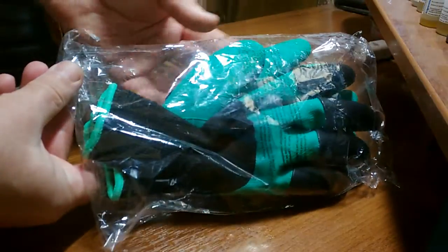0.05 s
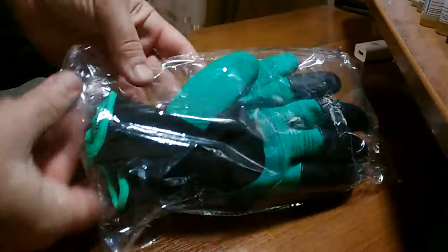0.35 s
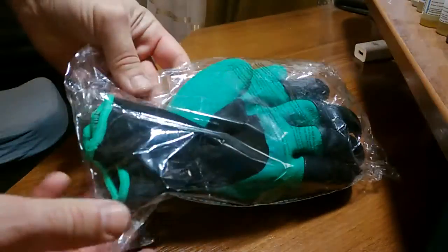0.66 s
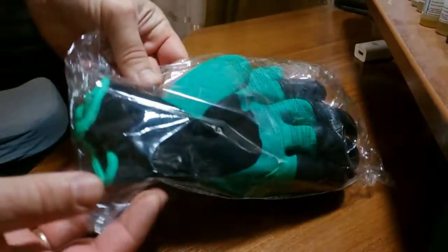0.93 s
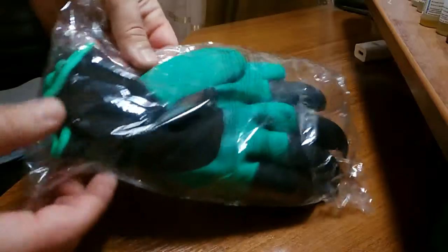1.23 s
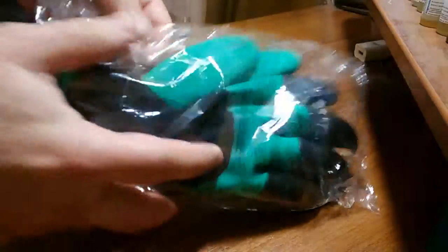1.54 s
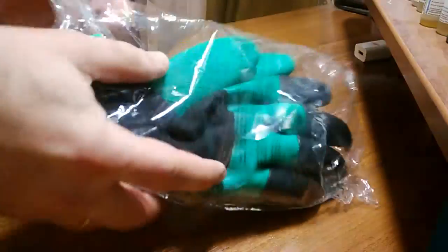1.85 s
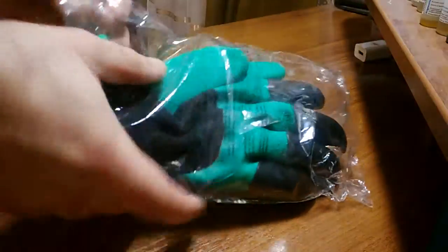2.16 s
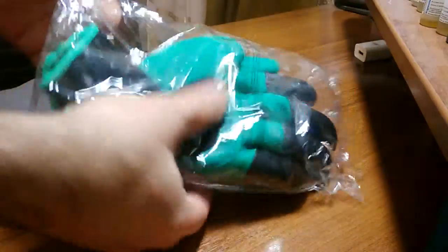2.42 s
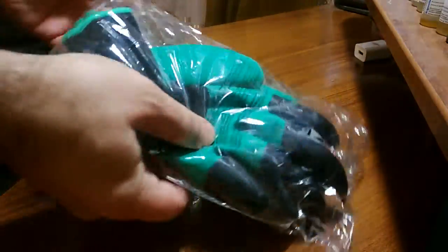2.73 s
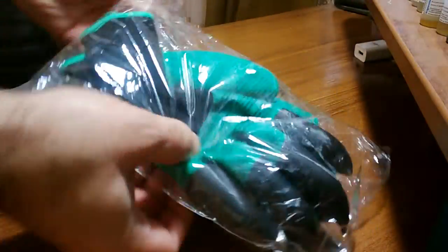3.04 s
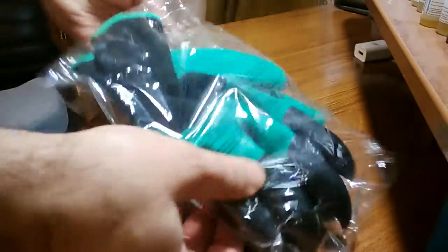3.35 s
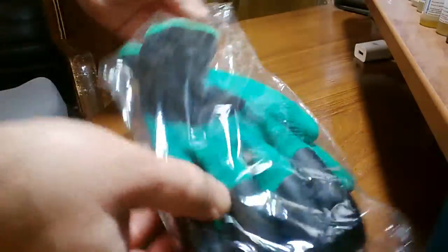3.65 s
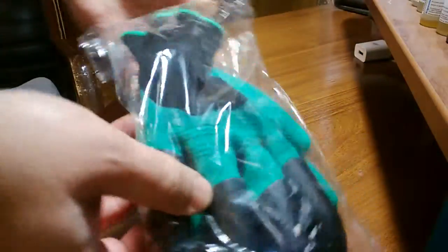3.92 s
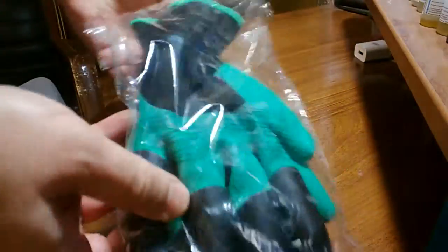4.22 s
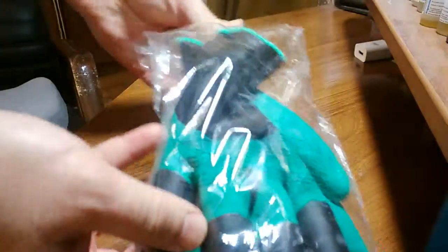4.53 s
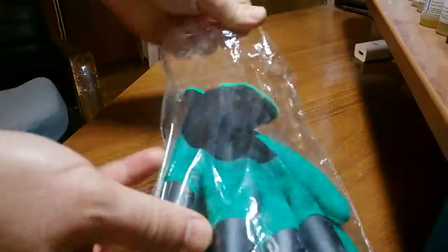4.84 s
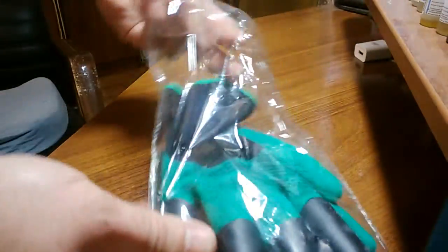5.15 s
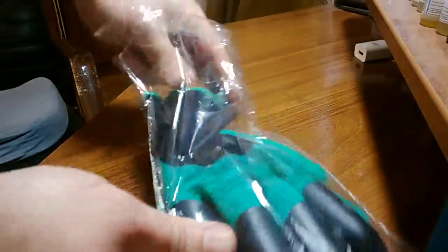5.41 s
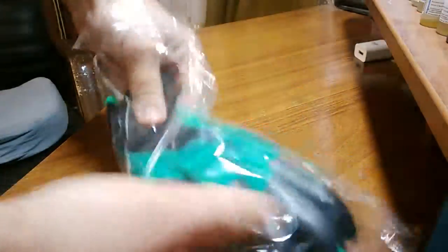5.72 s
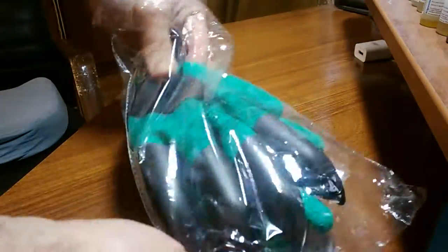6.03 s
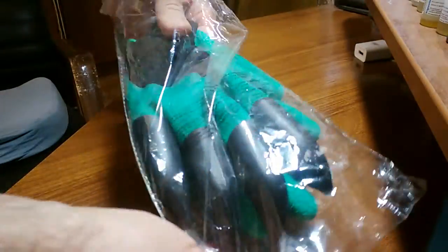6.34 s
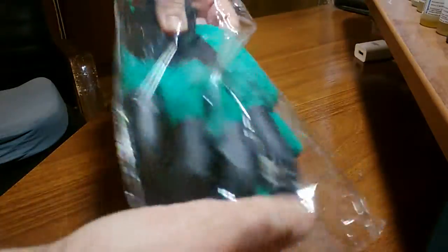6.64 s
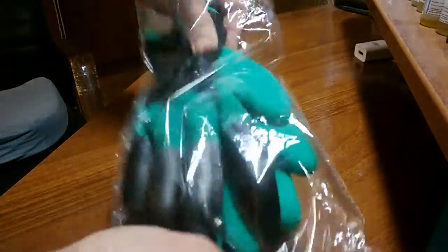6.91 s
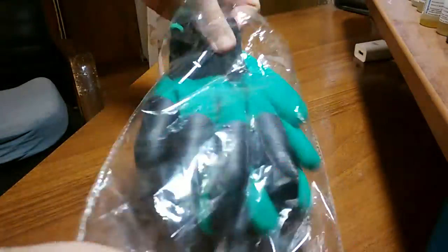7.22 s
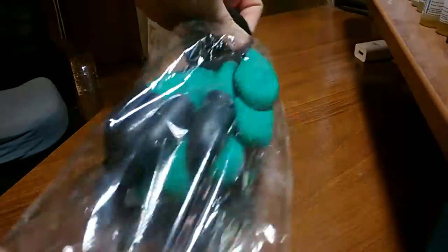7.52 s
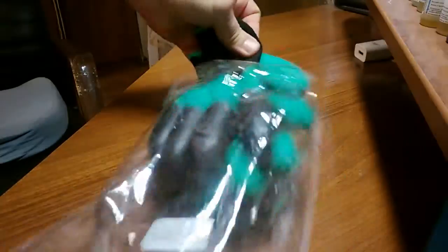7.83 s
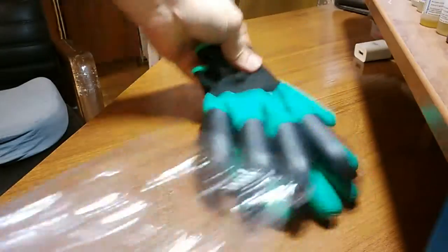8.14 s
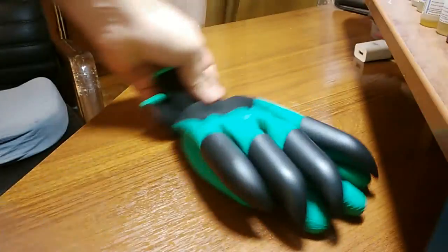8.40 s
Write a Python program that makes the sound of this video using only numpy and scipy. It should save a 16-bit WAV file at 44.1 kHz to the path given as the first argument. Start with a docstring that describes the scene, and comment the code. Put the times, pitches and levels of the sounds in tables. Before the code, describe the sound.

In a small room, hands handle a thin plastic bag with gloves inside. A light rustle grows into bright crinkling, with short grips, brief pauses, sharp snaps and small hollow pops, while the gloves bump softly within. Later their hard claws tap a wooden table, then the gloves rub out through the bag's mouth and the rustle dies away. The microphone is close.

```python
"""In a small room, hands take up a thin plastic bag on a wooden table. First comes a light rustle: creases
buckle in avalanches of clicks, film slides on film, and gloves bump softly inside. Short grips and
pauses follow, with sharp snaps and hollow pops. Near 6.4 s the gloves' hard claws tap the table; from
7.6 s the gloves rub out through the bag's mouth, and with one last tap the rustle dies away.
Throughout, a close microphone with a resonance near 5 kHz makes the crinkle bright."""
import sys
import numpy as np
from scipy import signal
from scipy.fft import rfft, irfft
from scipy.io import wavfile
from scipy.ndimage import uniform_filter1d

SR = 44100
rng = np.random.default_rng(int(sys.argv[2]) if len(sys.argv) > 2 else 0)


def to_wav(s):
    """Save 16-bit WAV."""
    ch = np.atleast_2d(s).T  # columns
    pcm = np.round(np.clip(ch, -1, 1) * 32767)  # PCM
    wavfile.write(sys.argv[1], SR, pcm.astype(np.int16))


N = 373527
TIME = np.arange(N) / SR

# Levels are relative; spectra give level per unit bandwidth.
# light rustle of the held bag: t/s, crease level/dB, folds re creases/dB, glove level/dB
LIGHT_RUSTLE = [(0, -48.5, -14, -71), (0.17, -52.5, -9, -60), (0.22, -42.5, -8.5, -59),
                (0.45, -40, -9.5, -52), (0.85, -38, -6.5, -63), (1.3, -35.5, -8.5, -56),
                (2.3, -36, -6.5, -59), (3.1, -38, -7, -69), (3.8, -37, -8, -58.5), (4.5, -38, -4.5, -51),
                (5.45, -37.5, -9.5, -63), (5.75, -31.5, -10.5, -55), (7.08, -31.5, -10, -51),
                (7.65, -35.5, -16.5, -52.5), (8.22, -38, -14, -50.5), (8.27, -55.5, -18, -69),
                (8.47, -60.5, -4, -74)]
# fingers grip the bag: t/s, duration/s, crease level/dB, folds re creases/dB, glove level/dB
FINGER_GRIPS = [(0.384, 0.41, -36, -6.5, -53), (0.97, 0.046, -35, -10.5, -56),
                (1.176, 0.16, -34.5, -7.5, -55), (1.396, 0.19, -36, -8, -61), (1.602, 0.18, -29, -7.5, -46),
                (1.779, 0.22, -32, -6, -53), (2.069, 0.14, -37.5, -6, -67), (2.316, 0.12, -36.5, -12, -59),
                (2.563, .13, -22, -9.5, -38.5), (2.797, 0.095, -31.5, -10.5, -64.5),
                (3.187, 0.19, -29.5, -10, -49), (3.413, 0.15, -30.5, -7.5, -45),
                (3.56, 0.15, -22.5, -9, -38.5), (3.869, 0.097, -29, -11, -49),
                (3.995, 0.029, -29, -13, -45), (4.271, .175, -32, -10.5, -61),
                (4.52, 0.097, -36, -13.5, -61), (4.661, 0.073, -33, -7, -55), (4.822, .082, -20, -13, -44),
                (4.936, 0.077, -26, -13, -46), (5.022, 0.26, -31, -9, -52.5), (5.569, 0.12, -27, -11, -50),
                (5.833, 0.057, -31, -9.5, -46), (5.992, 0.13, -24.5, -13, -45),
                (6.13, 0.17, -34.5, -9.5, -65), (6.494, 0.11, -29.5, -14, -48.5),
                (6.768, 0.13, -29, -9, -56), (6.88, 0.16, -28, -7.5, -53), (7.157, 0.18, -28.5, -9, -48.5),
                (7.362, 0.13, -33, -6.5, -66), (7.692, .135, -28, -11.5, -62),
                (7.95, 0.19, -30.5, -11, -48)]
# the hands rest and the rustle sinks: t/s, duration/s, drop/dB
HAND_PAUSES = [(0.889, 0.096, 7.5), (1.548, .05, 10), (2.003, 0.041, 1.5), (3.011, 0.096, 4),
               (3.366, 0.029, 4), (4.027, 0.032, 8.5), (4.609, .06, 15), (4.727, 0.042, 5), (5.246, .04, 7),
               (5.939, 0.024, 3), (6.445, 0.05, 17), (7.82, .12, 5)]
# spectrum of tight creases: f/Hz, level/dB
CREASE_SPECTRUM = [(1500, -28.5), (3100, -17), (4000, -5.5), (4600, 0.5), (6000, 1), (7100, -7.5),
                   (8800, -11.5), (10300, -16), (12500, -18.5), (16000, -20.5)]
# spectrum of broad folds: f/Hz, level/dB
FOLD_SPECTRUM = [(90, -23), (260, -7.5), (430, -2), (570, -9.5), (720, -3), (1100, -7), (1400, 0),
                 (1650, 1), (2100, 1.5), (2800, 0.5), (3400, -2), (6000, -20)]
# how strongly the taut, air-filled bag pops: t/s, level re folds/dB
POP_LEVELS = [(0, -5), (1.5, -9), (2.8, -9), (3.8, -0.5), (4.5, -1), (5.3, -5.5), (6, -7), (7.1, -9),
              (7.5, -8), (8.47, -31)]
# spectrum of the stuffed bag: f/Hz, level/dB
BULK_SPECTRUM = [(20, -24), (40, -14), (58, -2.5), (85, -0.5), (115, 1), (150, -7), (200, -3.5),
                 (300, -11.5), (450, -16.5), (700, -11), (1500, -16.5)]
# soft bumps of fingers and gloves: t/s, level/dB, f/Hz
SOFT_BUMPS = [(0.2, -49, 105), (0.988, -55, 104.5), (1.468, -42.5, 92), (2.602, -38, 200),
              (3.255, -35.5, 90), (3.455, -33, 292), (4.012, -41, 113.3), (4.829, -35.5, 95.4),
              (6.015, -48, 110.7), (7.956, -46, 239)]
# spectrum of the room air: f/Hz, level/dB
AIR_SPECTRUM = [(20, -14), (50, 14), (110, 4), (200, -8), (700, -31), (2000, -4), (5300, -36), (16000, -6)]
# large creases snap through: t/s, level over the first 5 ms/dB, folds re creases/dB, decay time/s
CREASE_SNAPS = [(0.023, -46, -24, 0.0017), (0.065, -45.5, -2.5, 0.0034), (0.306, -33, -10, 0.0044),
                (0.554, -28.5, -27, 0.0036), (0.7092, -28.5, -9.5, .005), (0.757, -38, -25, 0.0023),
                (1.058, -35.5, -17, .003), (1.15, -25.5, -10.5, 0.005), (1.345, -27.5, -4, 0.0029),
                (1.6208, -27.5, -4, 0.0057), (1.6871, -31.5, 5.5, 0.01), (1.8014, -24, -12, 0.0089),
                (2.067, -27.5, -14, 0.011), (2.234, -30.5, -12.5, 0.0035), (2.368, -28.5, -8.5, 0.0042),
                (2.4368, -30, -25, .003), (2.466, -34.5, -2, .004), (2.5564, -31.5, -9, 0.012),
                (2.6444, -19, -12, 0.0018), (2.7308, -26.5, -23, .003), (2.802, -29, -7.5, .002),
                (2.9283, -29.5, -6, 0.0025), (3.0358, -47.5, 10.5, .003), (3.141, -33.5, -19, 0.0034),
                (3.1935, -28.5, -11.5, 0.0036), (3.3704, -28, -32, .007), (3.4242, -25.5, -11, 0.029),
                (3.508, -22.5, -15, 0.014), (3.5549, -20.5, -10, 0.0056), (3.667, -20.5, -6, 0.0063),
                (3.9381, -22.5, -12, 0.0076), (4.022, -28, -6, 0.0037), (4.083, -33, -7.5, 0.018),
                (4.1916, -27, -7, 0.0035), (4.321, -26, -15, .002), (4.802, -32.5, -9, 0.039),
                (4.8348, -26, 1, 0.0083), (4.8862, -12, -16, 0.0013), (4.8987, -21, -12, 0.0025),
                (4.963, -26, -23, 0.0036), (5.055, -25.5, -15, 0.023), (5.246, -25, -9.5, 0.0036),
                (5.293, -33, -6.5, 0.015), (5.4158, -31, -18.5, 0.0054), (5.4636, -33, -22, 0.009),
                (5.5006, -35.5, -2.5, .005), (5.8798, -26.5, -12, 0.0032), (5.916, -26, -12, .003),
                (6.08, -22, -25, 0.002), (6.108, -21.5, -19, 0.0022), (6.1962, -24, -10.5, .005),
                (6.2937, -25.5, -12, 0.0044), (6.386, -27.5, -19, .004), (6.442, -23, -9.5, 0.0043),
                (6.729, -27, -8, 0.0022), (6.829, -30, -11, .004), (6.848, -25.5, -13, 0.0071),
                (6.9625, -23.5, -1, 0.0045), (7.155, -24, -21, .004), (7.207, -27.5, -4.5, 0.0037),
                (8.039, -28, -23, .002), (8.17, -29, -19, .005), (8.233, -30.5, -13.5, 0.0034)]
# the gloves' claws tap the table: t/s, f/Hz, level/dB, T60/s
CLAW_TAPS = [(6.414, 375, -36.5, 0.12), (6.443, 860, -29.5, 0.022), (8.303, 654, -51, 0.038)]
# the gloves are tugged out of the bag: t/s, duration/s, level/dB
GLOVE_TUGS = [(7.59, 0.038, -35.5), (7.745, 0.1, -42), (8.04, .12, -42)]
# spectrum of the open bag as a cavity: f/Hz, level/dB
MOUTH_SPECTRUM = [(200, -13.5), (450, -0.5), (780, 3.5), (950, 7), (1150, -16), (1500, -0.5), (3000, -5.5)]
# narrow resonances and two dips, from table top and microphone port: f/Hz, bandwidth/Hz, gain/dB
TABLE_AND_PORT = [(377, 59, -8.5), (720, 18, 2.5), (963, 26, 5.5), (1607, 66, -12), (5250, 350, 3.5),
                  (7870, 650, 0.5)]


def from_db(db):
    """Amplitude ratio: tenfold for every 20 dB."""
    return 10 ** (np.asarray(db) / 20)


def rms_one(x):
    """Normalisation to unit mean power."""
    return x / np.sqrt(np.mean(x ** 2) + 1e-20)


def in_time(rows):
    """Linear interpolation of each column of a curve at every sample."""
    times, *columns = np.transpose(rows)
    return [np.interp(TIME, times, column) for column in columns]


def through(x, impulse_response):
    """Convolution: the output of a linear system."""
    return signal.oaconvolve(x, impulse_response)[:N]


def scatter(spread_db):
    """Random gains, uniformly distributed in level with standard deviation spread_db."""
    return from_db(spread_db * rng.uniform(-np.sqrt(3), np.sqrt(3), N))


def evened(x, span_s):
    """Division by the running rms holds the slow level at 1 and keeps the fast grain."""
    power = x ** 2
    for _ in range(2):
        power = uniform_filter1d(power, max(int(span_s * SR), 1))
    return x / np.sqrt(np.maximum(power, 1e-12))


def response(spectrum, travel_s=0, ring_hz=1000, ring_db=0, ring_width_hz=260, size=2048):
    """Unit-energy filter with optional resonance and dispersion: in bending waves the treble leads."""
    hz = np.maximum(np.arange(size // 2 + 1) * SR / size, 1)
    points_hz, levels_db = np.transpose(spectrum)
    gain = from_db(np.interp(np.log(hz), np.log(points_hz), levels_db))
    detuning = 2 * (hz - ring_hz) / ring_width_hz
    gain = gain * np.sqrt(1 + (from_db(ring_db) ** 2 - 1) / (1 + detuning ** 2))
    cepstrum = irfft(np.log(gain))
    cepstrum[size // 2:] = 0   # minimum phase
    cepstrum[0] = 0
    phase_lag = 4 * np.pi * travel_s * np.sqrt(5000 * hz)   # group delay is travel_s at 5 kHz
    impulse = irfft(np.exp(2 * rfft(cepstrum) - 1j * phase_lag))
    return impulse / np.linalg.norm(impulse)


def stroke(start_s, length_s, catch_s=.03, swell_db=4.5, tightest_share=.55, let_go_db_per_s=402):
    """Amplitude envelope of one finger movement: catch the film, swell, ease, let go."""
    age = TIME - start_s
    share = np.clip(age / length_s, 0, 1)
    slack = np.minimum(np.abs(share - tightest_share) * 2, 1)
    let_go_db = let_go_db_per_s * np.clip(age - length_s, 0, 1)
    return np.clip(age / catch_s, 0, 1) * from_db(-swell_db * slack ** 2 - let_go_db)


def handling():
    """Incoherent sources add in power: rustle plus grips gives crease, fold and glove levels in dB."""
    crease_db, folds_db, gloves_db = in_time(LIGHT_RUSTLE)
    drop_db = sum(db * stroke(start_s, length_s) for start_s, length_s, db in HAND_PAUSES)
    power = from_db([crease_db, crease_db + folds_db, gloves_db] - drop_db) ** 2
    for start_s, length_s, crease_db, folds_db, gloves_db in FINGER_GRIPS:
        grip_power = from_db([crease_db, crease_db + folds_db, gloves_db]) ** 2
        power += np.outer(grip_power, stroke(start_s, length_s) ** 2)
    return 10 * np.log10(power)


def avalanche(buckles, fade_s, clicks_per_s, rise_s=0.00025):
    """Chain reaction: a buckle sets off its neighbours in a shower of clicks that swells and dies."""
    power = buckles ** 2 + 1e-18
    for pole in np.exp(-1 / (rise_s * SR)), np.exp(-2 / (fade_s * SR)):
        power = signal.lfilter([1 - pole], [1, -pole], power)
    chance = rng.random(N) * SR / clicks_per_s
    clicks = np.sign(chance - .5) * (chance < 1)
    return np.sqrt(power * SR / clicks_per_s) * clicks


def facets(buckles, spectrum, low_hz, high_hz, base_fade_s, edge_db=5, edge_hz=9000, count=10):
    """Resonance and dispersion: each facet has its own ring, sharpness and path across the film."""
    facet_of = rng.integers(0, count, N)
    points_hz, levels_db = np.transpose(spectrum)
    sharpness = rng.permutation(np.linspace(-1, 1, count))
    out = 0
    for k, hz in enumerate(np.geomspace(low_hz, high_hz, count)):
        shelf_db = edge_db * sharpness[k] / (1 + (edge_hz / points_hz) ** 4)
        colour = np.column_stack([points_hz, levels_db + shelf_db])
        fade_s = base_fade_s * 2 ** rng.uniform(0.87, 1)
        shower = avalanche(buckles * (facet_of == k), fade_s, clicks_per_s=3600)
        travel_s = 0.00081 * rng.uniform(0.51, 1.475)
        out = out + through(shower, response(colour, travel_s, hz, ring_db=7))
    return out


def pops(flips_per_s, low_hz=1950, high_hz=2330, width_hz=170, count=6):
    """Impulse-excited resonators: taut panels flip over and ring hollowly for a few milliseconds."""
    flips = (rng.random(N) < flips_per_s / SR) * scatter(spread_db=5) * rng.choice([-1, 1], N)
    panel_of = rng.integers(0, count, N)
    out = 0
    for k, hz in enumerate(np.geomspace(low_hz, high_hz, count)):
        panel = signal.iirpeak(hz, hz / width_hz, fs=SR)
        out = out + signal.lfilter(*panel, flips * (panel_of == k) + 1e-18)
    return out


def crinkle(crease_db, fold_db, median_buckles_per_s=235, slide_db=-15, loose_db=-40, firm_db=-29):
    """Buckling and friction: random ticks and pops over sliding hiss, denser under a firm grip."""
    pace = from_db(0.7 * (crease_db - np.median(crease_db)))
    firmness = np.clip((crease_db - loose_db) / (firm_db - loose_db), 0, 1)
    buckles = (rng.random(N) < median_buckles_per_s * pace / SR) * scatter(spread_db=2.5)
    # separate random gains make some buckles crisp, some dull
    creases = facets(buckles * scatter(1), CREASE_SPECTRUM, low_hz=4550, high_hz=6400, base_fade_s=.0045)
    folds = facets(buckles * scatter(1), FOLD_SPECTRUM, low_hz=770, high_hz=2800, base_fade_s=.004)
    taut_db, = in_time(POP_LEVELS)
    out = from_db(fold_db + taut_db) * evened(pops(flips_per_s=100 * pace), span_s=0.18)
    layers = (creases, CREASE_SPECTRUM, crease_db - 1.1), (folds, FOLD_SPECTRUM, fold_db - 1.56)
    for clicks, spectrum, level_db in layers:
        slide = through(rng.standard_normal(N), response(spectrum)) * np.sqrt(pace)
        film = rms_one(clicks) + from_db(slide_db) * slide
        crush, ticks = evened(film, span_s=0.041), evened(film, span_s=0.056)
        out = out + from_db(level_db) * (firmness * crush + (1 - firmness) * ticks)
    return out


def gloves(level_db, flop_gain_db=4.5, bump_gain_db=2.0, lumps_per_s=90):
    """Heavy damping: the padded bag flops in dull lumps, and firmer bumps ring for a cycle or two."""
    lumps = rng.standard_normal(N) * (rng.random(N) < lumps_per_s / SR)
    lumps = lumps + avalanche(lumps, fade_s=0.021, clicks_per_s=1700)
    flops = through(lumps, response(BULK_SPECTRUM, size=8192))
    out = from_db(level_db + flop_gain_db) * evened(flops, span_s=0.026)
    for start_s, bump_db, hz in SOFT_BUMPS:
        start = int(start_s * SR)
        cycles = hz * TIME[:min(SR // 4, N - start)]
        envelope = from_db(bump_db + bump_gain_db) * 2 * cycles * np.exp(1 - 2 * cycles)
        out[start:start + len(cycles)] += envelope * np.sin(2 * np.pi * cycles)
    return out


def room_air():
    """Stationary noise: the low rumble and faint hiss of a still room."""
    return through(rng.standard_normal(N), response(AIR_SPECTRUM, size=8192))


def reverberation(x, t60_s=0.31, wall_cut_hz=9000, build_s=0.011, count=8):
    """Diffuse reflection off walls and furniture: a short tail whose pattern shifts as the bag moves."""
    age = TIME[:SR // 2]
    place = np.linspace(0, count - 1, N)
    absorption = signal.butter(1, wall_cut_hz, fs=SR, output="sos")
    envelope = from_db(-60 * age / t60_s) * (1 - np.exp(-age / build_s))
    out = 0
    for k in range(count):
        tail = signal.sosfilt(absorption, rng.standard_normal(len(age)) * envelope)
        crossfade = np.sqrt(np.maximum(1 - np.abs(place - k), 0))
        out = out + through(x * crossfade, tail / np.linalg.norm(tail))
    return out


def snaps(clicks_per_s=9000, crease_hz=5300, fold_hz=2000, detune_octaves=0.14):
    """Snap-through: a large crease gives a sudden, dying shower of clicks with a ring of its own."""
    age, attack = TIME[:SR // 12], SR // 200
    out = np.zeros(N + 2 * len(age))
    for start_s, level_db, folds_db, fade_s in CREASE_SNAPS:
        start = int(start_s * SR)
        clicks = rng.choice([-1, 1], len(age)) * (rng.random(len(age)) < clicks_per_s / SR)
        shower = clicks * np.exp(-age / fade_s)
        for spectrum, hz, db in (CREASE_SPECTRUM, crease_hz, 0), (FOLD_SPECTRUM, fold_hz, folds_db - .5):
            ring_hz = hz * 2 ** (detune_octaves * rng.uniform(-0.8, 1))
            film = response(spectrum, travel_s=.0009, ring_hz=ring_hz, ring_db=5)
            snap = signal.fftconvolve(shower, film)
            out[start:start + len(snap)] += from_db(level_db + db) * snap / np.std(snap[:attack])
    return out[:N]


def claw_taps():
    """Damped free vibration: each tap of a claw on the table rings one short, woody note."""
    out = 0
    for start_s, hz, level_db, t60_s in CLAW_TAPS:
        age = np.clip(TIME - start_s, 0, 1)
        out = out + from_db(level_db - 60 * age / t60_s) * np.sin(2 * np.pi * hz * age)
    return out


def glove_swish():
    """Cavity resonance driven by friction: rubber rubs along the film and sounds the emptying bag."""
    rub = sum(from_db(db) * stroke(start_s, length_s) for start_s, length_s, db in GLOVE_TUGS)
    return rub * through(rng.standard_normal(N), response(MOUTH_SPECTRUM))


def scene(air_db=-66, room_db=-15):
    """Superposition of the direct sound, its reverberation and the room air, in one channel."""
    crease_db, fold_db, gloves_db = handling()
    direct = crinkle(crease_db, fold_db) + snaps() + gloves(gloves_db) + claw_taps() + glove_swish()
    air = from_db(air_db) * room_air()
    return (direct + from_db(room_db) * reverberation(direct) + air)[None]


def record(dry, gain_db=-2.5, cutoff_hz=15800):
    """Linear filtering: table top and microphone port colour the sound; a steep low-pass cuts the top."""
    out = from_db(gain_db) * dry
    for hz, width_hz, db in TABLE_AND_PORT:
        band = signal.lfilter(*signal.iirpeak(hz, hz / width_hz, fs=SR), out)
        out = out + (from_db(db) - 1) * band
    return signal.sosfilt(signal.ellip(12, .1, 80, cutoff_hz, fs=SR, output="sos"), out)


dry = scene()
out = record(dry)
to_wav(out)
```